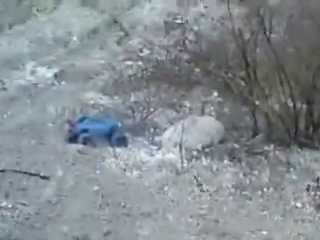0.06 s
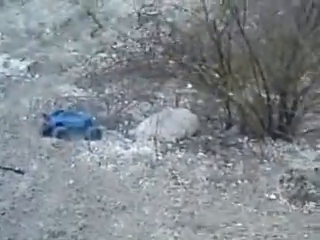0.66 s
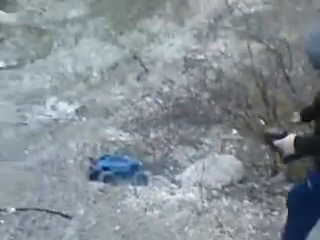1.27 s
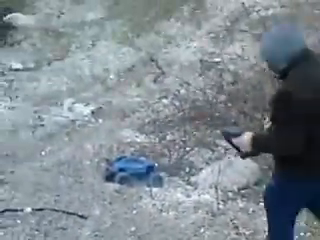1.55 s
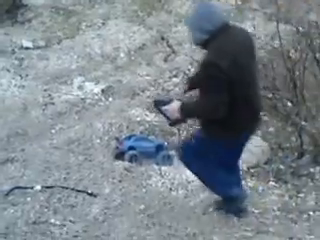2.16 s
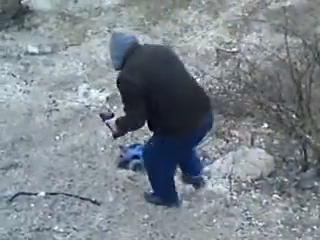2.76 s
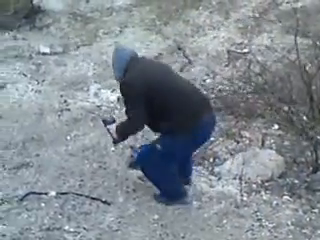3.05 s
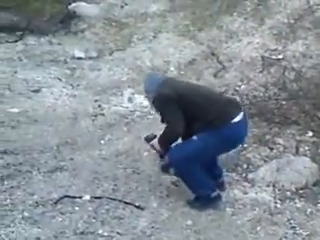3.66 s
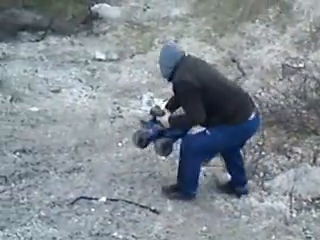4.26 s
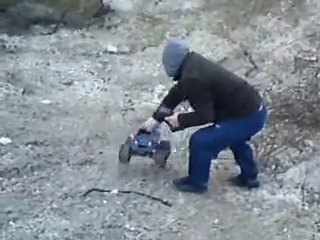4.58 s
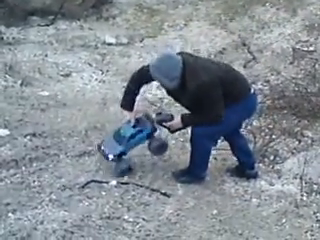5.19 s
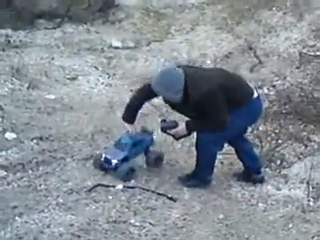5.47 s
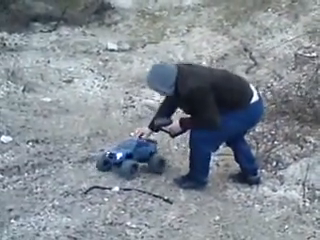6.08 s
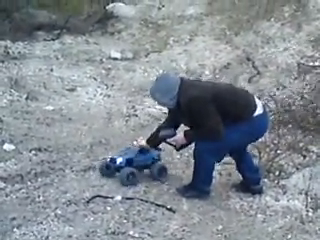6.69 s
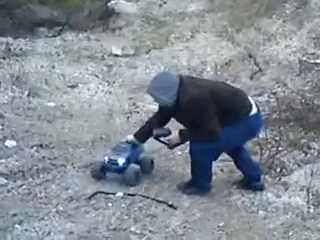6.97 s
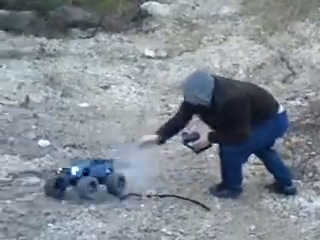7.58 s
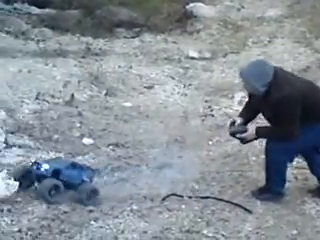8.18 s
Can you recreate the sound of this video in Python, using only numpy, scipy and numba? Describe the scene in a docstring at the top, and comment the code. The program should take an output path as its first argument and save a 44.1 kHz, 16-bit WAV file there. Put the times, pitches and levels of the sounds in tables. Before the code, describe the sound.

A small two-stroke model engine idles with metallic pinging and light wind, then speeds up into a raspy buzz with quick throttle blips.

```python
"""Model truck on gravel

A tiny glow-fuel two-stroke idles unevenly, is dragged free and set down, then revs and crawls off.
Every turn puffs out of the exhaust; uneven firings ping the metal pipe, and under throttle they
merge into a bright rasp. Grit scrapes, stones clack, wind bumps the microphone, and a stony bank
scatters a little sound back."""
import sys
import numpy as np
from scipy import signal
from scipy.fft import rfft, irfft
from scipy.io import wavfile
from scipy.ndimage import uniform_filter1d
from numba import njit

SR = 44100
rng = np.random.default_rng(int(sys.argv[2]) if len(sys.argv) > 2 else 0)


def to_wav(sig):
    """Store sig (one row per channel, or 1-D mono) as 16-bit WAV at the path in sys.argv[1].

    Samples outside -1..1 are clipped; the rate is SR.
    """
    pcm = np.clip(np.atleast_2d(sig), -1, 1) * 32767
    pcm = np.round(pcm).astype(np.int16)
    wavfile.write(sys.argv[1], SR, pcm.T)  # frames by channels


N = 372204
T = np.arange(N) / SR

# the idle sags and hunts as the engine loads up with fuel: t/s, turn rate/Hz
IDLE = [(0.0, 172.8), (0.05, 174.7), (1.83, 155.5), (1.88, 149.3), (2.61, 151.5), (2.78, 142.1),
        (3.23, 141.5), (3.538, 132.9), (3.85, 141.4), (4.06, 135.2), (4.75, 140.5), (4.85, 131.2),
        (5.06, 133.7), (5.35, 125), (5.56, 136.6), (5.59, 131.2), (5.85, 121.9), (6.2, 118)]
# the pipe's note shifts with gas heat and handling: t/s, f/Hz
PIPE_NOTE = [(0.0, 2468), (1.21, 2400), (1.93, 2475), (3.95, 2437), (4.16, 2243), (4.71, 2476),
             (5.16, 2273), (5.55, 2416), (5.96, 2405)]
# exhaust pops, each after a misfire: t/s, ping level/dB, crack level/dB
POPS = [(1.492, -9, -10), (3.005, -10.5, -10), (3.66, -15, -15), (3.717, -14, -24), (3.790, -14, -19),
        (3.861, -15, -11), (3.890, -15, -24), (3.918, -13, -14), (3.94, -12, -14), (4.829, -13, -13),
        (5.003, -11, -19), (5.115, -13, -6.5), (5.184, -11, -11), (5.231, -9, -15), (5.452, -12, -6.5),
        (5.522, -11.5, -9), (5.649, -17, -7), (5.93, -16, -3), (6.083, -16, -5)]
# tone of a dry knock: f/Hz, level/dB
KNOCK_EQ = [(100,-6.5),(400,-2.5),(900,-2.5),(1400,-4.5),(2000,-2),(3000,-5),(5000,-20),(8000,-40.5)]
# the outlet turns aside as the truck is lifted and as it slews: start/s, end/s, ramp/s
ASIDE = [(4.2, 6.26, 0.24), (7.04, 7.58, 0.082)]
# the truck drives off, outlet aimed back: start/s, end/s, ramp/s
DRIVING = [(7.58, 9.0, 0.19)]
# the truck is tipped nose down, then back on its wheels: start/s, end/s, ramp/s
TIPPED, GROUNDED = [(5.12, 5.535, 0.024)], [(5.5, 6.34, 0.037)]


def engine(blip_db=12):
    """The exhaust port opens once a turn; how well that charge burned sets the ping and the rasp."""
    hz, throttle = crankshaft()
    lean, spread_db, skip_db, turbulent = combustion(hz, throttle)
    times, strength, bangs, pumped, shakes = firings(hz, spread_db, skip_db, turbulent)
    gas = unit(fade(clicks(times, strength ** .8), decay_s=.008) * noise())
    # revving on the spot, the bangs leave the outlet short and crisp
    crisp = ramp(6.38, .1) * (1 - during(ASIDE)) * (1 - during(DRIVING))
    burst = blend(silencer(bangs, .0025), silencer(bangs, .0015), crisp)
    blast = bounce(blend(burst, gas, turbulent))
    puff = exhaust_puff(pumped, hz, throttle)
    rattle = fade(shakes, decay_s=0.02) * noise()
    throat = silencer_throat(pumped, bangs, rattle, throttle)
    clatter = engine_clatter(clicks(times, strength ** .6), rattle, gas, turbulent, throttle)
    body = puff + throat + clatter + shell_boom(blast, throttle) + shell_gap(blast) + chassis(rattle)
    bright = pipe_ping(bangs, gas, blast, throttle) + exhaust_rasp(blast, throttle, lean)
    # each blip is louder as well as higher
    overspeed = np.clip(hz / uniform_filter1d(hz, size=15001) - 1, -.08, .08)
    return body + undb(blip_db * throttle * overspeed) * bright


def crankshaft(open_s=6.278, held_hz=232.5, crawl_hz=248.4):
    """Turns per second and throttle 0-1: a wavering idle gives way to held revs with blips on top."""
    # throttle blips and lifts: t/s, length/s, added turn rate/Hz
    blips = [(6.735, 0.21, 14.5), (7.19, .03, 7), (7.272, 0.055, 36), (7.371, 0.05, 51),
             (7.468, 0.038, 16.5), (7.55, .035, 10), (7.755, 0.154, 19.5), (7.87, .08, -6),
             (8.029, 0.12, 13.0), (8.21, 0.166, 28), (8.386, 0.17, 37.5)]
    opened = ramp(open_s, 0.14)
    idle = curves(IDLE)[0] * (1 + 0.00499 * walk(14))
    revs = held_hz + (crawl_hz - held_hz) * ramp(7.118, 0.12) + swells(blips)
    hz = (1 - opened) * idle + opened * revs * (1 + 0.00422 * walk(30))
    flutter = (.0018 + .0022 * opened) * walk(110)
    throttle = ramp(open_s - 0.04, 0.046)  # the exhaust hardens ahead of the speed
    return hz * (1 + flutter), throttle


def combustion(hz, throttle, rich_hz=238, clean_hz=269, stumble_db=.4, flooded_db=6):
    """Ragged at idle, rich and skipping at low revs, clean at speed; slewing unsettles the burn."""
    # ways of burning: spread of firings/dB, cut on every second firing/dB, turbulent share/0-1
    idle_burn = (1.4, 1.0, .76)
    rich_burn = (1.0, 8, .14)
    clean_burn = (.8, .8, .025)
    aside = during(ASIDE)
    lean = np.clip((hz - rich_hz) / (clean_hz - rich_hz), 0, 1) * (1 - aside)
    spread_db, skip_db, turbulent = (idle + throttle * (rich + lean * (clean - rich) - idle)
                                     for idle, rich, clean in zip(idle_burn, rich_burn, clean_burn))
    spread_db += stumble_db * during([(2.95, 4.15, .3)])
    skip_db += flooded_db * during(TIPPED)  # tipped, it floods and hammers on every second turn
    return lean, spread_db, skip_db, np.clip(turbulent + 0.14 * throttle * aside, 0, 1)


def firings(hz, spread_db, skip_db, turbulent, misfire_s=.013, misfire_db=-8):
    """One charge a turn: its time and strength, and impulse trains of bangs, pumped gas and shakes."""
    turns = np.cumsum(hz) / SR
    turn = np.arange(1, int(turns[-1]))
    times = np.interp(turn, turns, T)
    i = (times * SR).astype(int)
    burn, slip, timing, pump, shake = rng.standard_normal((4096, 5))[:len(turn)].T
    # a poor burn leaves fuel for the next one; running rich, only every second turn fires well
    luck = 2 * np.tanh((burn - .65 * np.roll(burn, 1)) / 2)
    weak = (turn + np.cumsum(slip > 1.8)) % 2
    misfire = sum((times > s - misfire_s) & (times < s + .003) for s, _, _ in POPS)
    strength = undb(spread_db[i] * luck - skip_db[i] * weak + misfire_db * misfire)
    # ragged burning shifts each bang in time, fraying the top harmonics
    jitter_s = (.000004 + .00008 * turbulent[i]) * timing
    bangs = clicks(times + jitter_s, strength)
    pumped = clicks(times, undb(0.9 * spread_db[i] * pump) * strength ** 0.18)
    return times, strength, bangs, pumped, clicks(times, undb(2 * shake))


def pipe_ping(bangs, gas, blast, throttle):
    """Each bang strikes the pipe's close modes; the ping swells and rings into the next turn."""
    # tone of the pipe: f/Hz, level/dB
    pipe_eq = [(1800,-7.5),(2110,-10),(2240,3.5),(2420,-0.5),(2580,3),(2680,-5),(2780,-8.5),(3300,-7)]
    # brief dips in the ping: t/s, length/s, level/dB
    dips = [(1.63, 0.22, -2.5), (4.15, 0.12, -4.5), (6.4, 0.086, -1), (6.92, 0.055, -3), (7.77, 0.088, -6),
            (8.04, 0.11, -2.5)]
    # ping fader: idle/dB, then changes for throttle/dB, shielded/dB, aside/dB, driving/dB
    ping_mix = (-19.5, -4.5, -6.5, -8.5, 1.5)
    note = curves(PIPE_NOTE)[0]
    upper = ring(unit(bangs) + .06 * gas, note * 1.015, 155)
    lower = ring(blast, note * 1.012, 140)
    pipe = ring(upper + .4 * lower, note, 340)
    bark = ring(ring(blast, 2457, 430), 2485, 570)
    # turned aside or under throttle the ping widens into a bark, unless the pipe swings clear
    smear = np.maximum(during(ASIDE), throttle) * (1 - (1 - 0.43 * throttle) * flare_db() / 8)
    ping = steady(colour(blend(pipe, bark, np.maximum(smear, .06)), pipe_eq))
    dull_db = 0.05 * np.maximum(sag_hz(throttle), 0)
    return ping * undb(fader_db(ping_mix, throttle) + flare_db() + swells(dips) - dull_db)


def exhaust_rasp(blast, throttle, lean, on_pipe_db=3):
    """The outlet beams its treble, so the rasp changes colour as the truck turns; the jet adds hiss."""
    # rasp at idle, throttle open, turned aside and driving off: f/Hz, level/dB
    idle_eq = [(1200,-48),(1950,-2),(2150,-12),(2780,0),(3120,-0.5),(3450,0.5),(3900,-2.5),(4200,-3),(4600,-12),(5050,-1.5),(5450,-10),(5900,-17.5),(7000,-17.5),(7800,-24.5),(8800,-71.5)]
    open_eq = [(1200,-31.5),(2100,-37),(2680,4),(2880,-2),(3170,9),(3420,7),(3850,-11.5),(4090,2.5),(4800,-13.5),(5600,-18),(6000,-50),(7200,-37),(8800,-56)]
    aside_eq = [(1200,-34),(2100,3.5),(2550,-1.5),(2850,2),(3200,-2),(3650,-3),(4200,-4),(4800,-10.5),(5450,-16),(6000,-26.5),(7000,-21.5),(8800,-49)]
    driving_eq = [(1200,-50.5),(2200,-17.5),(2720,-2),(3000,-1),(3320,1.5),(3550,4),(3780,-15),(3950,-10),(4150,-1.5),(4400,-10),(4700,-14),(5600,-23),(6000,-34),(7200,-38),(8800,-55)]
    # hiss of the exhaust jet: f/Hz, level/dB
    jet_eq = [(2500,-27),(4000,-11),(4600,-0.5),(5600,-3.5),(6000,-18),(7300,-15.5),(8800,-43)]
    # swells and fades as the outlet swings about: t/s, length/s, level/dB
    swings = [(5.39, .2, -2.5), (6.88, 0.11, 0.5), (7.0, .06, 0.5), (7.63, .04, 2), (7.685, 0.03, 1),
              (7.93, 0.11, -0.5), (8.08, 0.09, 2)]
    # rasp fader: idle/dB, then changes for throttle/dB, shielded/dB, aside/dB, driving/dB
    rasp_mix = (-29, 9, -2.5, 1.5, 0)
    aside, driving = during(ASIDE), during(DRIVING)
    rasp = blend(colour(blast, idle_eq), colour(blast, open_eq), throttle)
    rasp = blend(rasp, colour(blast, aside_eq), aside)
    off_rocks = bounce(blast, lag_s=.0023, sway_s=.00006, sway_hz=7)
    rasp = steady(blend(rasp, colour(off_rocks, driving_eq), driving))
    jet = undb(-14 - 3 * driving) * throttle * unit(colour(noise(), jet_eq))
    level_db = fader_db(rasp_mix, throttle) + swells(swings) + on_pipe_db * lean
    off_beam_db = throttle * aside
    return (rasp + jet) * undb(level_db - off_beam_db - 0.07 * sag_hz(throttle))


def exhaust_puff(pumped, hz, throttle, sputter_db=0.5):
    """The piston pumps gas on every turn, fired or not, so the low notes stay clean."""
    # tone of the puff: f/Hz, level/dB
    puff_eq = [(30,-48.5),(75,-34),(120,0),(165,7),(205,5.5),(255,6.5),(295,5),(350,0),(410,5),(470,2),(555,-0.5),(640,-18),(830,-18.5),(1500,-49)]
    # puff fader: idle/dB, then changes for throttle/dB, shielded/dB, aside/dB, driving/dB
    puff_mix = (-33, 8.5, -1, -3.5, -2.5)
    pulses = bounce(pumped - hz / SR, share=0.36, lag_s=0.0012, sway_s=0.00035)
    puff = steady(colour(pulses, puff_eq)) * undb(sputter_db * (2 - throttle) * walk(25))
    return puff * undb(fader_db(puff_mix, throttle) + 0.149 * sag_hz(throttle))


def engine_clatter(hits, rattle, gas, turbulent, throttle, grounded_db=5):
    """Firings and rattle make a midrange clatter, louder once the truck is set on its wheels."""
    # clatter at idle and with the throttle open: f/Hz, level/dB
    idle_eq = [(250,-10.5),(520,5.5),(700,3.5),(830,6),(980,-2),(1200,6.5),(1550,-3.5),(1850,6),(2100,8),(2500,-2),(4000,-59)]
    open_eq = [(300,-20.5),(560,-8),(690,-10.5),(830,5),(970,-3.5),(1250,-3),(1430,-1),(1560,-5),(1680,-1),(1800,3),(1950,0.5),(2150,-4.5),(4000,-66.5)]
    # clatter fader: idle/dB, then changes for throttle/dB, shielded/dB, aside/dB, driving/dB
    clatter_mix = (-33, 3.5, -2.5, -1.5, 0)
    works = blend(silencer(hits, .0025), rattle, .17 + .78 * turbulent) + 2 * turbulent * gas
    bounced = bounce(works, share=.55, lag_s=.0016, sway_s=.00015)
    clatter = steady(blend(colour(works, idle_eq), colour(bounced, open_eq), throttle))
    return clatter * undb(fader_db(clatter_mix, throttle) + grounded_db * during(GROUNDED))


def silencer(x, spread_s, size=4096):
    """Bounces inside the can delay each frequency by a different amount."""
    chance = rng.standard_normal(size)
    lag = spread_s * np.abs(np.interp(np.arange(size // 2 + 1) / 24, np.arange(size), chance))
    return signal.fftconvolve(x, irfft(np.exp(-2j * np.pi * np.cumsum(lag) * SR / size)))[:N]


def silencer_throat(pumped, bangs, rattle, throttle, hz=945, width_hz=220, grounded_db=10):
    """The silencer can rings with a throaty, hollow note, rougher at idle."""
    # throat fader: idle/dB, then changes for throttle/dB, shielded/dB, aside/dB, driving/dB
    throat_mix = (-41, 6.5, -9.5, -9.5, -3.5)
    growl = blend(pumped + 2 * throttle * bangs, rattle, 0.23 * (1 - 0.99 * throttle))
    throat = steady(ring(ring(growl, hz, width_hz), hz, width_hz))
    lift_db = grounded_db * during(GROUNDED) * (1 - throttle)
    return throat * undb(fader_db(throat_mix, throttle) + lift_db)


def exhaust_pops(ping_gain_db=39, crack_gain_db=19):
    """Unburnt fuel goes off at once: a dry crack, then the pipe rings."""
    s, ping_db, crack_db = np.transpose(POPS)
    note = curves(PIPE_NOTE)[0]
    ping = ring(ring(clicks(s, undb(ping_db)), note * 1.015, 130), note, 430)
    crack = colour(clicks(s, undb(crack_db)), KNOCK_EQ)
    return undb(ping_gain_db) * ping + undb(crack_gain_db) * crack


def shell_boom(blast, throttle):
    """The hollow body shell rings with the exhaust and fades as the pipe swings clear."""
    # swell while the truck hangs from a hand: t/s, length/s, level/dB
    hanging = [(4.92, 0.36, 10)]
    # shell fader: idle/dB, then changes for throttle/dB, shielded/dB, aside/dB, driving/dB
    shell_mix = (-36.5, -8.5, -5.5, 4, -24)
    shell = steady(ring(ring(blast, 2018, 310), 1922, 290))
    duck_db = 0.78 * (1 - throttle) * flare_db()
    return shell * undb(fader_db(shell_mix, throttle) + swells(hanging) - duck_db)


def shell_gap(blast, width_hz=180):
    """The gap under the lifted shell rings at a note that wanders as the truck swings."""
    # the hollow note: t/s, f/Hz, level/dB
    gap_note = [(4.42, 2796, -52), (4.51, 2790, -35), (4.6, 2620, -33), (4.66, 2558, -24),
                (4.74, 2800, -37), (4.94, 2845, -32), (5.03, 2770, -46), (5.15, 2640, -21.5),
                (5.25, 2760, -39), (5.34, 2900, -51), (5.55, 2800, -46), (5.62, 2640, -36),
                (5.7, 2800, -45)]
    hz, db = curves(gap_note)
    return steady(ring(ring(blast, hz, width_hz), hz, width_hz)) * undb(db) * during(ASIDE[:1])


def chassis(rattle, hz=398, width_hz=310, level_db=-33.5):
    """The chassis drums at a low note as the tyres skim the ground and when it is set down."""
    skimming = [(4.81, 5.05, 0.037)]  # start/s, end/s, ramp/s
    drum = unit(ring(ring(rattle, hz, width_hz), hz, width_hz))
    return drum * undb(level_db) * during(GROUNDED + skimming)


def fader_db(mix, throttle):
    """Level of one engine layer, from the throttle and how the truck is placed."""
    # someone crouches in front of the truck: start/s, end/s, ramp/s
    shielded = [(2.9, 4.15, 0.85)]
    idle, opened, hidden, turned, away = mix
    placement_db = hidden * during(shielded) + turned * during(ASIDE) + away * during(DRIVING)
    return idle + opened * throttle + placement_db


def flare_db(tipped_db=3):
    """The ping rises as the pipe swings clear of the body or the truck tips nose down."""
    # the pipe rings out: t/s, length/s, level/dB
    flares = [(2.3, 0.93, 0), (3.94, 0.15, 2), (4.65, 0.14, 3.5), (4.87, 0.1, 5.5), (5.22, 0.35, 4),
              (5.46, 0.14, 2), (6.3, 0.068, 3), (6.66, 0.25, 3.5), (7.14, 0.17, 14.5), (7.29, 0.13, 10),
              (7.372, 0.055, 9), (7.46, 0.2, 10.5), (7.63, 0.041, 1.5), (8.14, 0.063, 4), (8.33, 0.28, 2.5)]
    return swells(flares) + tipped_db * during(TIPPED)


def sag_hz(throttle, fresh_hz=152.4):
    """How far the idle has sunk; loaded up, it thumps more and pings and rasps less."""
    return (1 - throttle) * (fresh_hz - curves(IDLE)[0])


def gravel():
    """Dense grains of grit: one long drag and a few soft crunches."""
    # tone of scraping grit: f/Hz, level/dB
    grit_eq = [(80,-19),(200,-11),(450,0.5),(750,-8),(1150,-9),(1450,0),(1950,2.5),(2700,-2),(3400,-5),(4200,-0.5),(5200,-3.5),(6000,-13),(6600,-20.5),(8800,-46)]
    # gravel dragged under the truck: t/s, level/dB
    drag = [(4.14, -35.5), (4.188, -26.5), (4.384, -24.5), (4.4, -33), (4.428, -33), (4.45, -56)]
    # soft crunches: t/s, length/s, level/dB
    crunches = [(0.007,0.17,-25.5),(0.218,0.1,-28),(0.534,0.068,-29),(0.997,0.11,-36.5),(1.166,0.35,-34),(1.447,0.13,-29)]
    grains = noise() * undb(2.2 * walk(450))
    dragging = uniform_filter1d(((T > drag[0][0]) & (T < drag[-1][0])) * 1., size=900)
    scrape = unit(colour(grains, grit_eq)) * undb(curves(drag)[0] + 5.5) * dragging
    crunching = swells((s, length, undb(db + 1)) for s, length, db in crunches)
    return scrape + unit(colour(grains, KNOCK_EQ)) * crunching


def knocks(gain_db=13, ring_db=5, width_hz=600):
    """Short knocks of stone and plastic, each with its own dead note."""
    # stones clack underfoot and the chassis knocks: t/s, level/dB, f/Hz
    hits = [(0.055, -16, 1700), (0.383, -19.5, 1800), (0.745, -26.5, 930), (1.182, -18, 1260),
            (1.533, -17, 1640), (4.092, -26, 1190), (4.192, -19.5, 493), (4.425, -19, 2100),
            (5.519, -25, 600), (5.556, -30, 603), (6.231, -19.5, 1880)]
    s, db, hz = np.transpose(hits)
    burst = fade(clicks(s, undb(db)), decay_s=0.0026) * noise()
    note = undb(ring_db) * ring(burst, np.interp(T, s, hz), width_hz)
    return undb(gain_db) * colour(burst + note, KNOCK_EQ)


def wind(lull_db=-47, buffet_db=3, thud_hz=62, thud_gain_db=46, air_db=-47):
    """Wind buffets the microphone over a soft open-air hush."""
    # tone of the rumble and of the hush: f/Hz, level/dB
    rumble_eq = [(15,-14),(40,-5),(75,-8),(130,-12),(250,-13),(600,-41),(1500,-60)]
    air_eq = [(30,-55.5),(150,-37),(500,-3.5),(1500,-38),(5000,18.5),(9000,-12.5)]
    # gusts: t/s, length/s, rise/dB
    gusts = [(1.9, 1.2, 5.6), (2.7, 0.18, 3.5), (3.4, 2.06, 15), (4.25, 0.38, 7.73), (5.0, 0.73, 11.6),
             (5.85, 0.85, 11.9)]
    # sudden low bumps on the microphone: t/s, level/dB
    bumps = [(1.665,-20),(2.34,-23),(2.645,-23),(2.695,-26),(3.596,-18.5),(3.967,-25),(4.22,-28),(5.0,-38)]
    s, db = np.transpose(bumps)
    hits = clicks(s, undb(db))
    push = undb(lull_db + swells(gusts) + buffet_db * walk(22)) + fade(hits, decay_s=0.0099)
    rumble = colour(noise() * push, rumble_eq) / np.std(colour(noise(), rumble_eq))
    thud = undb(thud_gain_db) * ring(ring(hits, thud_hz, 70), thud_hz, 140)
    return rumble + thud + undb(air_db) * unit(colour(noise(), air_eq))


def bounce(x, share=0.3, lag_s=0.000695, sway_s=.00004, sway_hz=4):
    """Add a bounce off the stones; its path shifts with the truck, so overtones swell and fade."""
    lag = lag_s + sway_s * walk(sway_hz)
    return unit(x + share * np.interp(T - lag, T, x))


def bank(x, wet_db=-20, t60_s=0.082, size=16384):
    """Diffuse scatter from the stony slope."""
    t = np.arange(size) / SR
    echo = rng.standard_normal(size) * undb(-60 * t / t60_s) * (t > .006)
    return undb(wet_db) * signal.fftconvolve(x, echo / np.linalg.norm(echo))[:N]


def undb(db):
    """Decibels to gain."""
    return 10 ** (np.asarray(db) / 20)


def curves(rows):
    """Each column of a table, joined by straight lines in time."""
    s, *columns = np.transpose(rows)
    return [np.interp(T, s, c) for c in columns]


def ramp(at_s, length_s):
    """A straight rise from 0 to 1, centred on a moment."""
    return np.clip((T - at_s) / length_s + .5, 0, 1)


def during(spells):
    """1 within each (start, end, ramp) spell, 0 outside."""
    return sum(ramp(start, length) - ramp(end, length) for start, end, length in spells)


def swells(rows):
    """A bell-shaped rise and fall for each (time, length, height)."""
    return sum(height * np.exp(-(2 * (T - s) / length) ** 2) for s, length, height in rows)


def unit(x):
    """Scale to rms 1."""
    return x / np.sqrt(np.mean(x ** 2))


def steady(x, size=6001):
    """Scale to a running rms of 1; single firings keep their differences."""
    return x / np.sqrt(uniform_filter1d(x ** 2, size) + 1e-12)


def blend(a, b, share):
    """Equal-power crossfade from a to b."""
    share = np.clip(share, 0, 1)
    return np.sqrt(1 - share) * unit(a) + np.sqrt(share) * unit(b)


def noise():
    """White noise."""
    return rng.standard_normal(N)


def walk(rate_hz):
    """Random drift with a spread near 1."""
    return np.interp(T * rate_hz, np.arange(4096), rng.standard_normal(4096))


def clicks(times, sizes):
    """Impulses, each shared between two neighbouring samples."""
    at = np.clip(times * SR, 0, N - 2)
    i = at.astype(int)
    return np.bincount(i, sizes * (1 - at + i), N) + np.bincount(i + 1, sizes * (at - i), N)


def fade(x, decay_s):
    """Give every impulse an exponential tail."""
    return signal.lfilter([1], [1, -np.exp(-1 / (decay_s * SR))], x)


def colour(x, points, size=4096):
    """Minimum-phase EQ through (f/Hz, level/dB) points."""
    hz, db = np.transpose(points)
    f = np.maximum(np.arange(size // 2 + 1) * SR / size, 1)
    cepstrum = irfft(np.log(undb(np.interp(np.log(f), np.log(hz), db))))
    cepstrum[1:size // 2] *= 2
    cepstrum[size // 2 + 1:] = 0
    return signal.fftconvolve(x, irfft(np.exp(rfft(cepstrum))))[:N]


def ring(x, hz, width_hz):
    """One resonance, still or gliding."""
    return svf(x, hz * np.ones(N), float(width_hz))


@njit
def svf(x, hz, width):
    """Band-pass with a moving centre."""
    y, band, low = np.empty(len(x)), 0., 0.
    for i in range(len(x)):
        g, k = np.tan(np.pi * hz[i] / SR), width / hz[i]
        v = (band + g * (x[i] - low)) / (1 + g * (g + k))
        band, low, y[i] = 2 * v - band, low + 2 * g * v, k * v
    return y


def scene():
    """Truck and gravel in front of the slope, in the wind."""
    near = engine() + exhaust_pops() + gravel() + knocks()
    return (near + bank(near) + wind())[None]


def record(dry):
    """A steep low-pass trims the top of the treble."""
    return signal.sosfilt(signal.ellip(10, .2, 80, 8700, fs=SR, output="sos"), dry)


dry = scene()
out = record(dry)
to_wav(out)
```